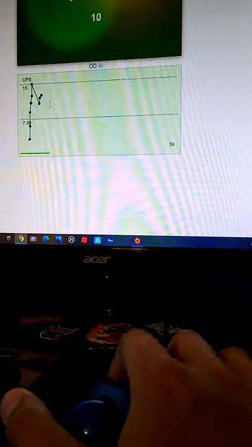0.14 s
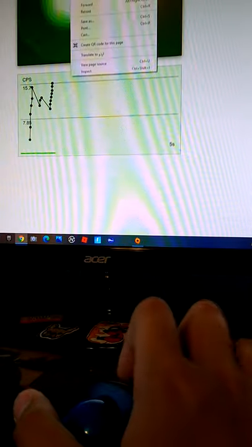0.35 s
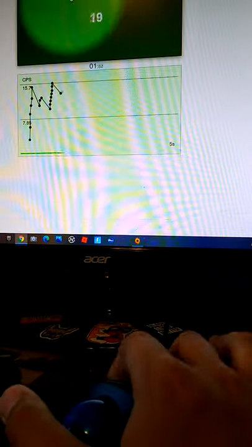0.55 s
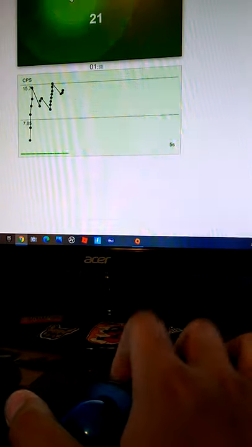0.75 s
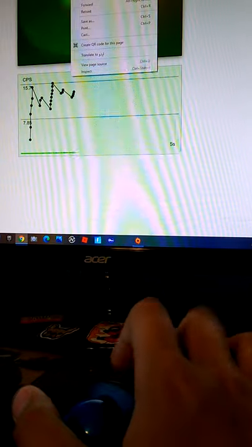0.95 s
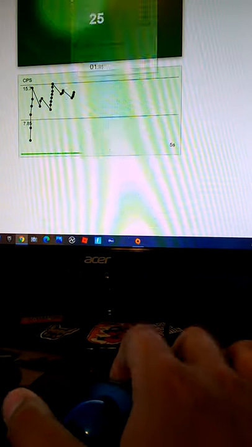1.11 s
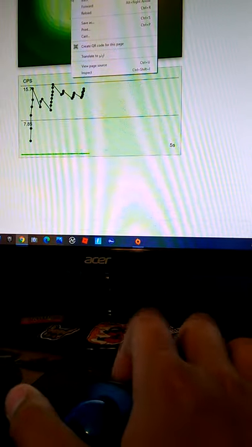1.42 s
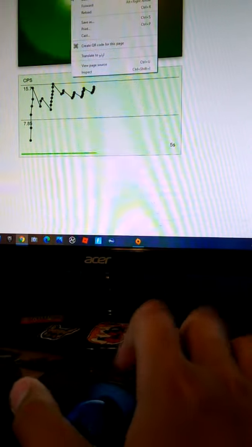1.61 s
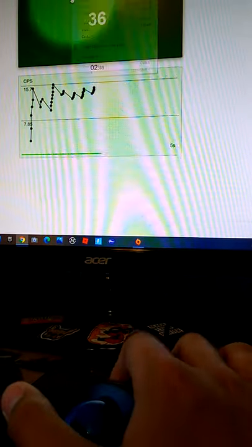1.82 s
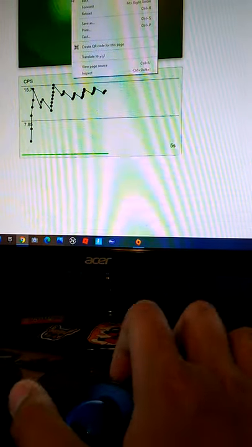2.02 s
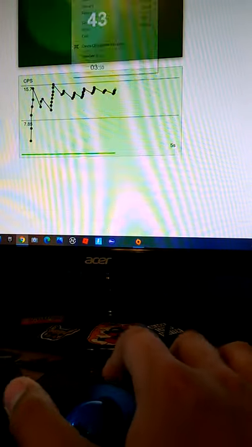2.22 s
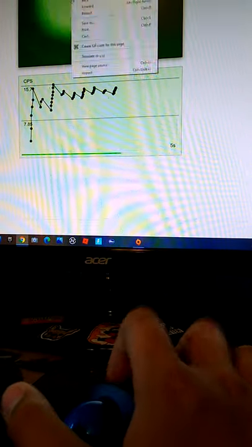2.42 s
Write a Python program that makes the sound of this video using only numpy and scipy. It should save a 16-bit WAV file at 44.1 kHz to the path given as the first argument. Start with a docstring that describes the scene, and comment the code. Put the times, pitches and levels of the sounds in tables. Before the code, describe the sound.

Computer mouse clicks rattle in short, raspy bursts as a fingertip drags over the button.

```python
"""A small quiet room, close to a phone on the desk: a fingertip drags down a mouse button seven times.
The hinge ticks under the load, the skin sticks and slips in a ratchet of short rasps, and one to four
times a drag the microswitch snaps. Slips and snaps knock the hollow plastic shell and, as the hand bears
down, thump the desk. Soft finger taps fall between the drags, over a bed of low hum and hiss."""
import sys
import numpy as np
from scipy import signal
from scipy.fft import rfft, irfft
from scipy.io import wavfile

SR = 44100
rng = np.random.default_rng(int(sys.argv[2]) if len(sys.argv) > 2 else 0)


def store_wav(level_fs):
    """Save 16-bit WAV to argv[1]."""
    pcm = np.round(np.clip(np.atleast_2d(level_fs), -1, 1) * 32767)
    wavfile.write(sys.argv[1], SR, pcm.T.astype(np.int16))


N = 112454

# Event and mode levels are relative; level() sets each layer's place in the mix.
# drags of the finger: start/s, length/s, rubbing/dB, weight on the desk/dB
FINGER_DRAGS = [(0.207, .125, 6, -1.5), (0.556, 0.15, -1, 0.5), (0.876, 0.13, 3, -6), (1.216, 0.12, 6, 3),
                (1.554, 0.098, 6.5, -2.5), (1.889, 0.098, 4, -1.5), (2.218, 0.12, 2, -0.5)]
# slips of the fingertip: t/s, rasp/dB, fine grit/dB, knock on the shell/dB
SKIN_SLIPS = [(0.2209, -38, -47.5, -52), (0.2256, -38, -44, -33.5), (0.244, -40.5, -44, -39.5),
              (0.2527, -28.5, -36, -39.5), (0.261, -40, -44, -40), (0.2691, -58, -41, -56),
              (0.2742, -39, -31, -48), (0.281, -28.5, -37, -55), (0.2923, -44, -36, -63),
              (0.2982, -81, -37, -62), (0.3015, -38, -38, -51), (0.3104, -38, -49, -66),
              (0.3184, -36.5, -34, -48), (0.5694, -39.5, -41, -55), (0.5784, -36.5, -35.5, -38.5),
              (0.5893, -32, -40, -49), (0.5961, -44, -32, -61.5), (0.6061, -46, -47, -52),
              (0.6113, -31, -38, -39), (0.6206, -34.5, -32, -47), (0.6372, -43, -37, -63),
              (0.6464, -37.5, -33, -59), (0.6558, -77, -52, -58), (0.662, -51, -48, -68),
              (0.6711, -39.5, -36.5, -56), (0.8856, -34, -53, -58), (0.8909, -39, -37, -44),
              (0.901, -35.5, -59, -40.5), (0.9056, -37, -39, -60), (0.9134, -43, -33, -45.5),
              (0.9288, -30.5, -40, -32.5), (0.9375, -35, -36, -51), (0.948, -64, -61, -45),
              (0.953, -35, -42, -47), (0.964, -37.5, -31, -34), (0.974, -46, -49, -43.5),
              (0.9777, -31.5, -63, -46), (0.987, -40, -33, -47.5), (1.2334, -34, -38.5, -50),
              (1.2498, -32.5, -41, -67), (1.2573, -53, -32, -46), (1.2742, -34, -36, -54),
              (1.2834, -40, -35, -50), (1.2906, -63, -99, -42.5), (1.302, -40, -33, -66),
              (1.309, -30.5, -38, -62), (1.3217, -46, -35, -55), (1.3387, -40.5, -64, -72),
              (1.5683, -32, -37, -43.5), (1.579, -60, -55, -61), (1.5872, -33, -37, -45),
              (1.5959, -35, -34, -41), (1.5997, -45, -67, -40.5), (1.6084, -55, -33, -48),
              (1.6252, -51, -35, -52), (1.6299, -32, -80, -75), (1.6384, -79, -38.5, -44.5),
              (1.663, -34, -53, -45), (1.6725, -37, -36, -53), (1.9034, -38, -34.5, -60),
              (1.9241, -35.5, -36, -44), (1.9474, -58, -48, -70), (1.983, -37.5, -38.5, -50.5),
              (2.2335, -39, -64, -50), (2.2386, -47, -41, -56), (2.2438, -36, -47, -70),
              (2.2568, -32, -33, -38.5), (2.2679, -50, -55, -72), (2.277, -33.5, -35, -65),
              (2.2826, -33, -67, -36), (2.2891, -33, -34, -45), (2.3109, -32, -29, -61),
              (2.3213, -36, -37, -57)]
# snaps of the microswitch: t/s, level/dB
SWITCH_SNAPS = [(0.2131, -26), (0.2367, -21.5), (0.259, -21), (0.2893, -21), (0.5925, -22), (0.8798, -27.5),
                (0.929, -39), (0.9646, -22), (1.2247, -27), (1.2473, -20.5), (1.2717, -23), (1.3091, -24),
                (1.5602, -27.5), (1.586, -22), (1.6163, -21.5), (1.8949, -31.5), (1.9151, -25),
                (1.9384, -22), (1.9693, -23.5), (2.2249, -27), (2.2461, -23.5), (2.269, -20.5),
                (2.2994, -21)]
# the mouse settling before or after a drag: t/s, knock on the shell/dB, thump on the desk/dB
MOUSE_SETTLES = [(.333, -56, -24), (.348, -47, -35), (.359, -56, -41), (.534, -55.5, -37.5),
                 (.864, -49, -27), (1.021, -50, -44), (1.402, -50.5, -52), (1.419, -50, -32.5),
                 (1.679, -49, -30), (1.747, -52, -42), (2.031, -55, -34.5), (2.357, -52.5, -54),
                 (2.366, -54, -39)]
LEAD_S = 0.0003  # rasps and hinge ticks come this far ahead of their cues


def amp(db):
    """Decibels to gain."""
    return 10 ** (np.asarray(db) / 20)


def level(x, db):
    """Set the rms level."""
    return x * amp(db) / np.sqrt(np.mean(x ** 2))


def convolve(x, response):
    """Pass a sound through an impulse response."""
    return signal.fftconvolve(x, response)[:N]


def gains(hz, db, size):
    """An EQ curve through the given points, as a gain for each FFT bin."""
    return amp(np.interp(np.log(np.fft.rfftfreq(size, 1 / SR) + 1), np.log(hz), db))


def colour(x, hz, db, size=4096):
    """Minimum-phase EQ through the given points."""
    cepstrum = irfft(np.log(gains(hz, db, size)))
    cepstrum[1:size // 2] *= 2
    cepstrum[size // 2 + 1:] = 0
    return convolve(x, irfft(np.exp(rfft(cepstrum))))


def pulses(times, db):
    """One impulse for each event."""
    out = np.zeros(N)
    np.add.at(out, np.clip((times * SR).astype(int), 0, N - 1), amp(db))
    return out


def ring(x, modes, rise_s):
    """Excite damped modes that take a moment to build up."""
    t = np.arange(SR // 4) / SR
    response = sum(amp(db - 60 * t / t60) * np.sin(2 * np.pi * hz * t) for hz, t60, db in modes)
    return convolve(x, response * (1 - np.exp(-(t / rise_s) ** 2)))


def bursts(times, db, rise_s, fall_s):
    """Power envelope of short bursts that peak at the given times."""
    t = np.arange(SR // 20) / SR - .01
    shape = np.exp(-2 * np.where(t < 0, (t / rise_s) ** 2, t / fall_s))
    return np.abs(convolve(pulses(times + t[0], db) ** 2, shape))


def scrape(power, eq):
    """Dense micro-clicks merge into noise under a power envelope, with its own EQ on each side."""
    hz, *sides = np.array(eq).T
    return np.array([colour(np.sqrt(power) * rng.standard_normal(N), hz, db) for db in sides])


def place(x, left_db, lag_s=0.00019):
    """The mouse lies to the right: delay and trim the left channel."""
    t = np.arange(N) / SR
    return np.array([amp(left_db) * np.interp(t - lag_s, t, x), x])


def pressure(start, length, peak_share):
    """The finger's pressure swells and eases over one drag."""
    progress = (np.arange(N) / SR - start) / length
    return np.interp(progress, [0, peak_share, 1], [0, 1, 0])


def room_tone(waver=0.16, shared_below_hz=730):
    """Faint centred rumble, wide hiss and a wavering hum as of a computer fan."""
    # colour of the air: f/Hz, level/dB
    air_eq = [(15, 4), (25, -12.5), (70, 3), (161, -1.5), (229, -2.5), (344, -17), (840, -19), (1370, -23),
              (2050, -27.5), (3080, -25.5), (5730, -35), (16000, -35.5)]
    # partials of the hum: f/Hz, level/dB
    hum_partials = [(48.4, -72.5), (136, -80), (215.3, -69.5), (290.7, -83), (414.5, -84)]
    t, f = np.arange(N) / SR, np.fft.rfftfreq(N, 1 / SR)
    spectrum = gains(*np.array(air_eq).T, N)
    width = f / np.hypot(f, shared_below_hz)
    mid, side = (irfft(rfft(rng.standard_normal(N)) * spectrum * share, N) for share in (1, width))
    drift = lambda: np.interp(t, np.linspace(0, t[-1], 20), rng.standard_normal(20))
    hum = sum(amp(db) * np.sqrt(2) * (1 + waver * drift()) * np.sin(2 * np.pi * hz * t + .5 * drift())
              for hz, db in hum_partials)
    return level(np.array([mid + side, mid - side]), -66.5) + hum


def hinge():
    """The button's hinge gives thin ticks as it is loaded and let go."""
    # ticks: t/s, level/dB
    ticks = [(0.1972, -6), (0.209, 2), (0.5507, -3), (.5675, 8), (0.6636, 13.5), (.6962, -6), (0.8667, -10),
             (0.8756, 5.5), (1.0145, 7), (1.2235, 10), (1.5476, -3), (1.557, 9), (1.892, 11),
             (2.024, -10.5), (2.2117, -3), (2.2202, 6), (2.3493, 5)]
    # modes of the hinge: f/Hz, t60/s, level/dB
    hinge_modes = [(5220, 0.0032, 3), (5820, 0.0046, -8), (2950, 0.01, -16.5)]
    t, db = np.array(ticks).T
    ticking = ring(pulses(t - LEAD_S, db), hinge_modes, rise_s=0.0006)
    return level(place(ticking, left_db=-17.5), -68)


def finger():
    """Slips and snaps shed rasp and grit that set the plastic ringing; the skin rubs softly between."""
    # colour of the plastic's rasp: f/Hz, left/dB, right/dB
    rasp_eq = [(280, -29, -2.5), (866, -24.5, -3.5), (1670, -17.5, -16), (2040, -14, -6),
               (2990, -18.5, 3.5), (3510, -17.5, -5.5), (5080, -11, 0.5), (6100, -22.5, -7.5),
               (6920, -3.5, -9), (8200, -64.5, -16), (16300, -26, -15.5)]
    # colour of the skin's fine grit: f/Hz, left/dB, right/dB
    grit_eq = [(2000, -30, -77), (6600, -20, -35), (7650, -2.5, -29), (9900, -0.5, -45), (10850, 8, -28),
               (12600, 3.5, -7), (15000, 9, -3), (16200, -20, -39)]
    # thin after-ring of the plastic: f/Hz, t60/s, level/dB
    plastic_modes = [(3670, .04, -9), (5090, .035, -4), (6850, .12, -16), (10480, .025, -2),
                     (11480, .025, -2), (14400, .06, -3), (14680, .04, -2)]
    t, rasp_db, grit_db, _ = np.array(SKIN_SLIPS).T
    snap_t, snap_db = np.array(SWITCH_SNAPS).T
    rub = sum(amp(db) ** 2 * pressure(start, length, peak_share=0.23)
              for start, length, db, _ in FINGER_DRAGS)
    snaps = bursts(snap_t - LEAD_S, snap_db, rise_s=0.0012, fall_s=0.0013)
    slip_rasp = bursts(t - LEAD_S, rasp_db, rise_s=0.0017, fall_s=0.0024)
    slip_grit = bursts(t - 0.00034, grit_db, rise_s=0.0015, fall_s=0.0013)
    rasp_power = slip_rasp + amp(-12) ** 2 * snaps + amp(-47) ** 2 * rub
    grit_power = slip_grit + amp(-17) ** 2 * snaps + amp(-53) ** 2 * rub
    plastic = np.array([ring(np.sqrt(grit_power) * noise, plastic_modes, rise_s=0.00031)
                        for noise in rng.standard_normal((2, N))])
    rasp, grit = scrape(rasp_power, rasp_eq), scrape(grit_power, grit_eq)
    return level(rasp, -50) + level(grit, -55.5) + level(plastic, -66.5)


def switch(lead_s=0.0007, detune_spread=0.032):
    """The spring snaps over and swells the button's ring; the finger's load detunes each snap a little."""
    # modes of the switch and the button over it: f/Hz, t60/s, level/dB
    switch_modes = [(2700, .006, 0), (2950, .005, -2), (4400, .003, -15), (5150, .005, -13)]
    snaps = np.zeros(N)
    for t, db in SWITCH_SNAPS:
        detune = 1 + detune_spread * rng.standard_normal()
        modes = [(hz * detune, t60, mode_db) for hz, t60, mode_db in switch_modes]
        snaps += ring(pulses(np.array([t - lead_s]), db), modes, rise_s=0.0022)
    return level(place(snaps, left_db=-13), -50)


def knocks(snap_trim_db=-12):
    """Times and levels of the blows that slips and snaps deal the mouse."""
    slip_t, _, _, slip_db = np.array(SKIN_SLIPS).T
    snap_t, snap_db = np.array(SWITCH_SNAPS).T
    return np.r_[slip_t, snap_t], np.r_[slip_db, snap_db + snap_trim_db]


def shell(scatter_db=8.5):
    """Slips, snaps and settling knock the hollow shell, each at a spot with its own mix of modes."""
    # modes of the shell: f/Hz, t60/s, level/dB
    shell_modes = [(597, 0.053, -7.5), (700, 0.035, -4), (811, 0.059, -5), (934, 0.024, -3),
                   (1060, 0.019, 0.5), (1237, 0.036, -12.5)]
    knock_t, knock_db = knocks()
    settle_t, settle_db, _ = np.array(MOUSE_SETTLES).T
    t, db = np.r_[knock_t, settle_t], np.r_[knock_db, settle_db]
    spot_db = scatter_db * np.clip(rng.standard_normal((len(t), len(shell_modes))), -1, 1)
    hollow = sum((-1) ** k * ring(pulses(t, db + spot_db[:, k]), [mode], rise_s=0.00041)
                 for k, mode in enumerate(shell_modes))
    return level(place(hollow, left_db=0, lag_s=0.00002), -57)


def desk(stick_s=0.00294, stick_share=0.48):
    """Knocks thump the desk under the weight of the hand; the settling mouse adds dull bumps."""
    # modes of the desk: f/Hz, t60/s, level/dB, left minus right/dB
    desk_modes = [(89.6, 0.15, 4, -32.5), (133, 0.11, -4.5, -8), (171, 0.086, -9.5, -17),
                  (230, 0.061, -11, -15), (423, 0.062, -24.5, 3.5)]
    t, db = knocks()
    settle_t, _, thump_db = np.array(MOUSE_SETTLES).T
    weight = sum(amp(weight_db) * pressure(start, length, peak_share=0.36) ** 0.76
                 for start, length, _, weight_db in FINGER_DRAGS)
    # each knock, compressed 2:1, shoves the desk, with a smaller pull the other way just before it
    shoves = pulses(t, db / 2) - stick_share * pulses(t - stick_s, db / 2)
    force = weight * shoves + pulses(settle_t, thump_db)
    left = [(hz, t60, mode_db + left_db) for hz, t60, mode_db, left_db in desk_modes]
    right = [mode[:3] for mode in desk_modes]
    return level(np.array([ring(force, modes, rise_s=0.0019) for modes in (left, right)]), -51)


def taps():
    """Soft, dull contacts as the fingers land on or nudge the mouse."""
    # light taps: t/s, level/dB
    contacts = [(0.344, -7.5), (0.544, -20), (0.558, -11), (0.866, -11), (1.3985, -17), (1.402, -10),
                (1.414, -5.5), (1.42, -12.5), (1.427, -6), (1.547, -9), (1.7315, -5.5), (1.7345, 3.5),
                (1.742, -4.5), (1.749, -5), (1.751, -4.5)]
    # colour of a tap: f/Hz, left/dB, right/dB
    tap_eq = [(70, -1, -0.5), (129, 0, 18.5), (310, -22.5, -4), (600, 0.5, 3.5), (1134, 1, 7.5),
              (1600, -40.5, -11.5), (2040, -2.5, 1), (2690, -9, 8), (5560, -31, -7.5), (8200, -21, -26),
              (15100, -20.5, -36)]
    t, db = np.array(contacts).T
    power = bursts(t, db, rise_s=0.0012, fall_s=0.004)
    return level(scrape(power, tap_eq), -63.5)


def room(x, early_db=-12.5, late_db=-16.5, crossover_hz=4000):
    """Quick reflections from desk and screen, then the short tail of the room."""
    t = np.arange(SR // 2) / SR
    bands = [signal.butter(2, crossover_hz, kind, fs=SR, output="sos") for kind in ("low", "high")]
    unit_energy = lambda response: response / np.sqrt(np.sum(response ** 2))

    def tail(t60_s, onset_s):
        """Dense echoes that fade in and die away."""
        return rng.standard_normal(len(t)) * amp(-60 * t / t60_s) * (1 - np.exp(-(t / onset_s) ** 2))

    mono = x.sum(axis=0) / np.sqrt(2)
    out = []
    for side in x:
        late_response = sum(signal.sosfilt(band, tail(t60_s=0.18, onset_s=0.018)) for band in bands)
        late = convolve(mono, unit_energy(late_response))
        early = convolve(side, unit_energy(tail(t60_s=0.017, onset_s=0.006)))
        out.append(side + amp(early_db) * early + amp(late_db) * late)
    return np.array(out)


def scene():
    """The mouse in its room, over the bed of room tone."""
    return room(hinge() + finger() + switch() + shell() + desk() + taps()) + room_tone()


def record(dry, low_hz=36, top_hz=16200):
    """The phone cuts the deepest bass and the top."""
    low_cut = signal.butter(4, low_hz, "high", fs=SR, output="sos")
    high_cut = signal.ellip(10, .2, 70, top_hz, fs=SR, output="sos")
    return signal.sosfilt(high_cut, signal.sosfilt(low_cut, dry))


dry = scene()
out = record(dry)
store_wav(out)
```